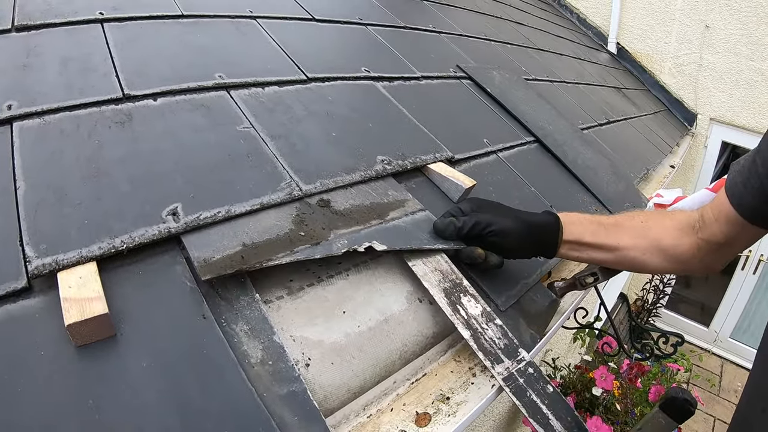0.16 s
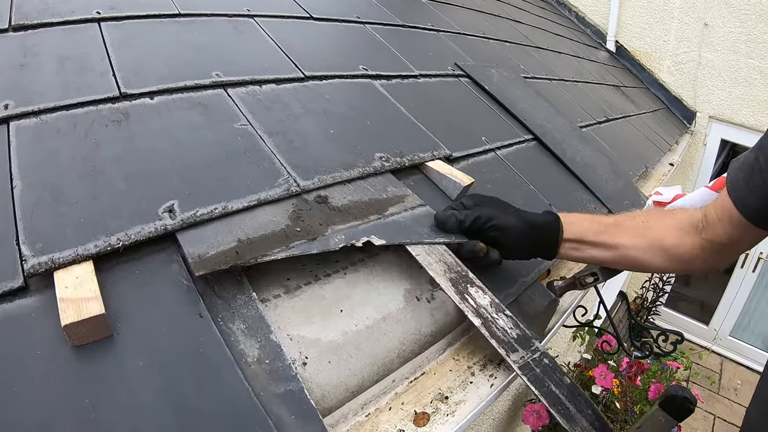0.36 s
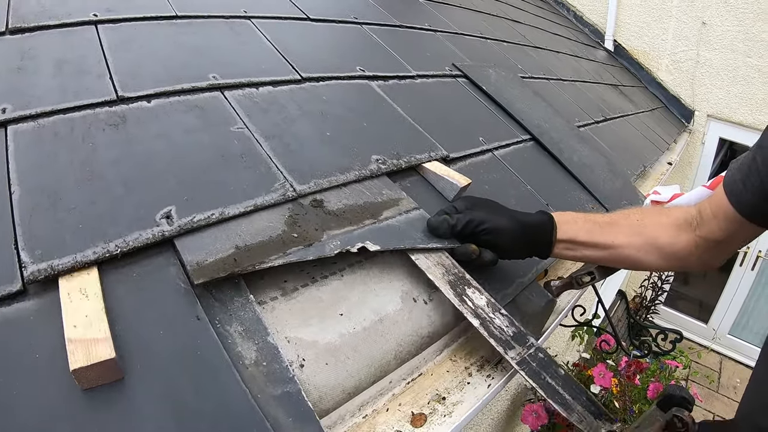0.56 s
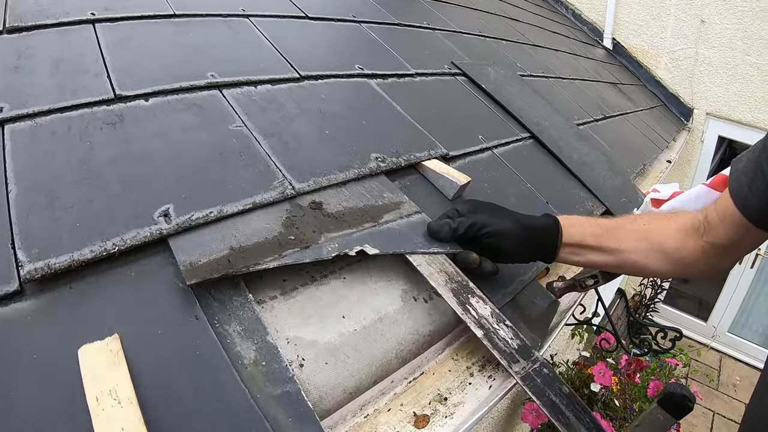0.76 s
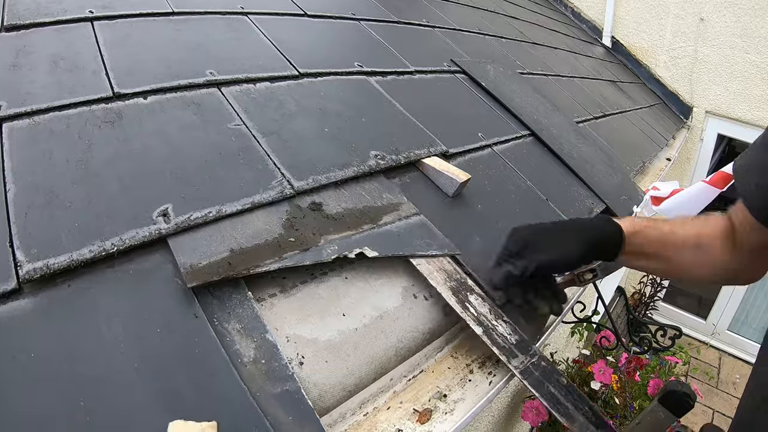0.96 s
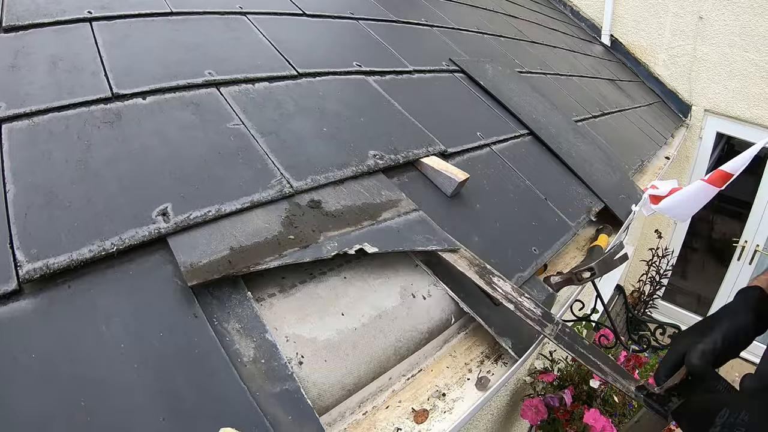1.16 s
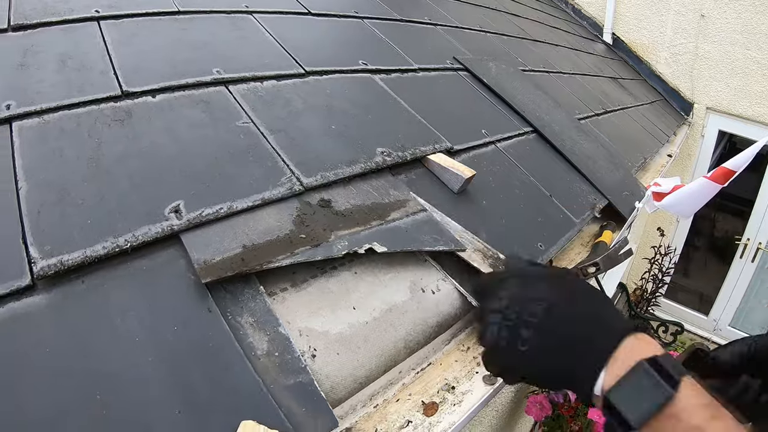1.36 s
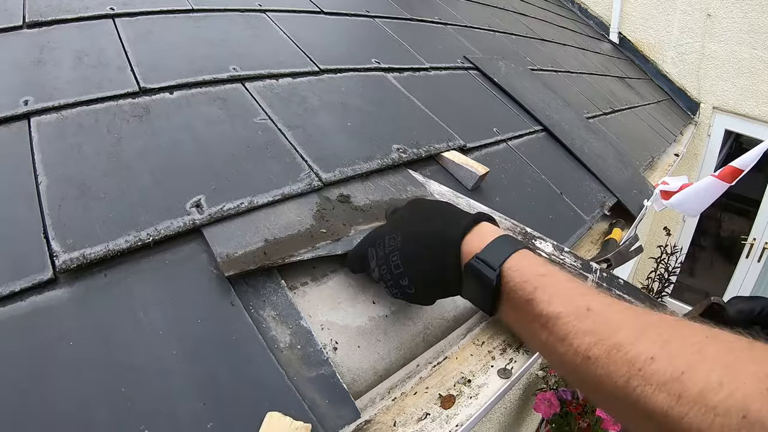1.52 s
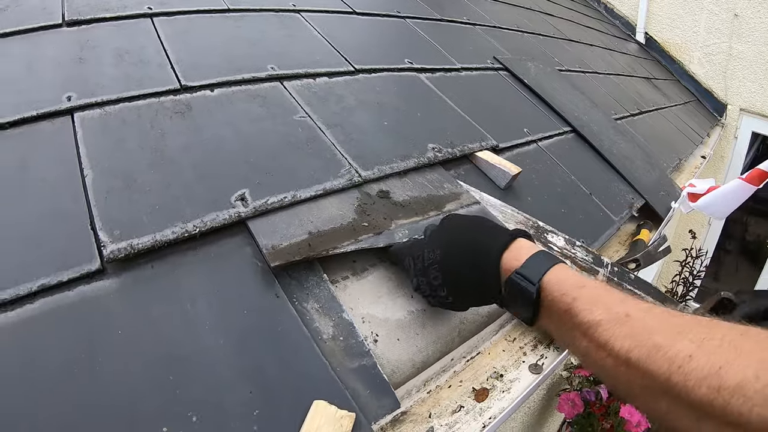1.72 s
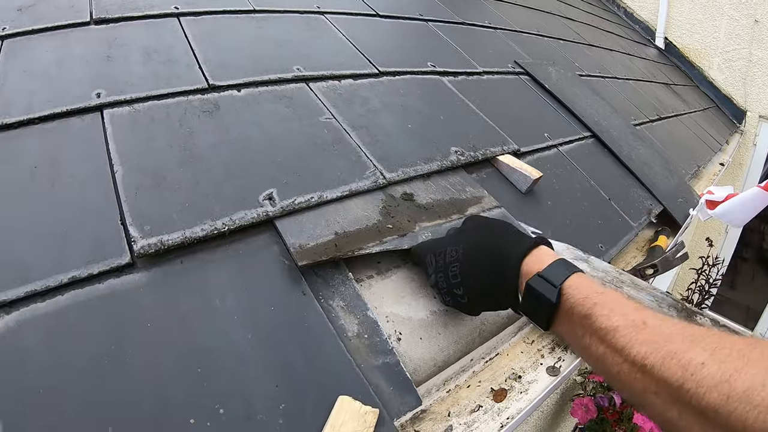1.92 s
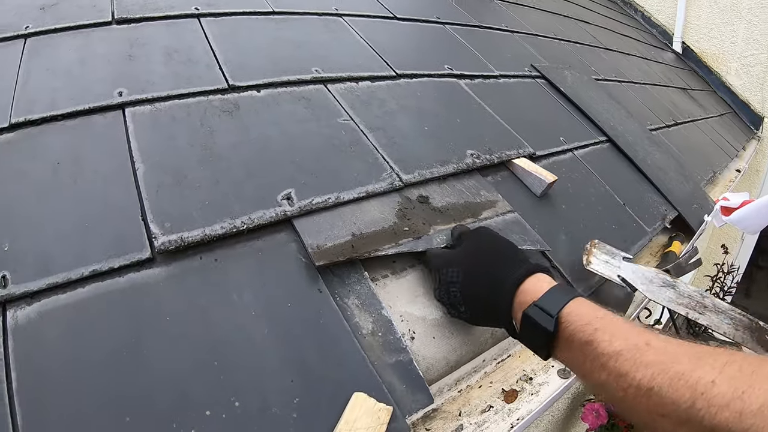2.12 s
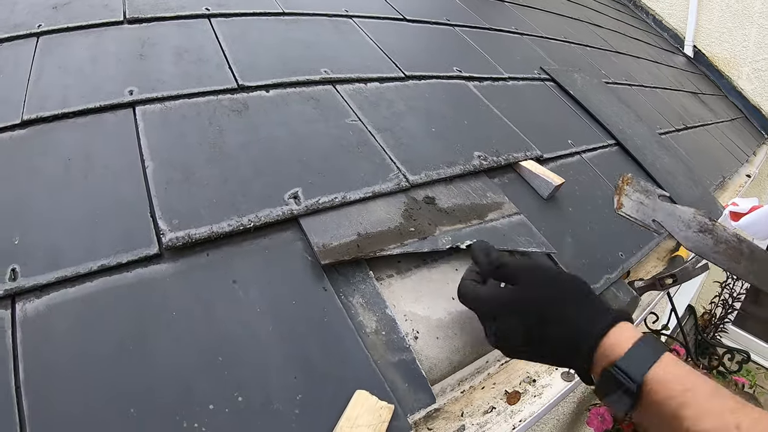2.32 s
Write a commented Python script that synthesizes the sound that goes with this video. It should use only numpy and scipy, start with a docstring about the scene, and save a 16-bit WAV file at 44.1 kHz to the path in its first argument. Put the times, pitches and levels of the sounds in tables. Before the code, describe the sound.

A flat steel bar clicks and clacks against broken roof slate, with gritty scrapes between the knocks and a faint metallic ring. Light wind and handling rumble on the close microphone outdoors.

```python
"""On a roof, a gloved hand works a flat steel bar out from under a broken slate. Sliding friction
excites the resonances of slate and steel; impacts on slate and batten knock, clack and click; the
bar rings faintly in its own modes until a touch damps it, and stick-slip makes its blade tick.
Wind and handling rumble in the single microphone over a quiet outdoor noise floor."""
import sys
import numpy as np
from scipy import signal
from scipy.fft import rfft, irfft, next_fast_len
from scipy.io import wavfile
from scipy.ndimage import uniform_filter1d, map_coordinates

SR = 44100
rng = np.random.default_rng(int(sys.argv[2]) if len(sys.argv) > 2 else 0)


def generate_wav(signal):
    """Clip the signal to [-1, 1] and save it as 16-bit WAV at the path in sys.argv[1]."""
    frames = np.transpose(np.atleast_2d(signal))
    scaled = np.clip(frames, -1, 1) * 32767
    pcm = np.round(scaled).astype(np.int16)
    wavfile.write(sys.argv[1], SR, pcm)


N = 105840

# normal modes of the steel bar: f/Hz, level/dB, T60/s
BAR_MODES = [(2275, 0, .2), (2662, 0, 2), (3070, 0, .7), (3413, 0, .6), (3670, 0, .2), (4380, -2, .6),
             (4502, 0, .5), (4702, 0, .5), (4955, 1, .85), (5060, -8, .15), (5306, 0, .5), (5706, 0, .35),
             (6290, -4, .25), (6710, 0, .25), (7160, 0, .3), (7750, 0, .12), (8470, 0, .15), (11900, 0, .2)]
RISE_S = 0.00038  # time constant of a contact's onset


def amp(db):
    """Amplitude ratio of a level in dB."""
    return 10 ** (np.asarray(db) / 20)


def unit(x):
    """Normalisation to rms 1."""
    return x / np.sqrt(np.mean(x ** 2, axis=-1, keepdims=True) + 1e-20)


def curves(rows):
    """Linear interpolation in time: one value per sample for each column after the first."""
    s, *cols = np.transpose(rows)
    return [np.interp(np.arange(N) / SR, s, c) for c in cols]


def along(points, f):
    """Interpolation of (f/Hz, value) points on a logarithmic frequency axis."""
    hz, values = np.transpose(points)
    return np.interp(np.log(f + 1), np.log(hz), values)


def wobble(rate):
    """Smooth random modulation: a spline through `rate` knots a second."""
    knots = rng.standard_normal(int(N * rate / SR) + 4)
    return map_coordinates(knots, [np.arange(N) * rate / SR])


def filtered(x, response):
    """Linear filtering: the spectrum of x times a complex frequency response."""
    m = next_fast_len(2 * x.shape[-1])
    return irfft(rfft(x, m) * response(np.fft.rfftfreq(m, 1 / SR)), m)[..., :x.shape[-1]]


def resonance(f, hz, width_hz):
    """Frequency response of a damped oscillator."""
    return 1j * f * width_hz / (hz * hz - f * f + 1j * f * width_hz)


def band(f, lo_hz, hi_hz):
    """Band-pass magnitude with fourth-order slopes."""
    return 1 / np.sqrt((1 + (lo_hz / (f + 1e-3)) ** 8) * (1 + (f / hi_hz) ** 8))


def scrape():
    """Forced vibration: juddering friction and loose grit drive the resonances of slate and bar."""
    # resonances of the slate: f/Hz, bandwidth/Hz, level/dB
    slate_modes = [(2527, 440, 7.5), (3855, 310, 2.5), (4247, 160, 0.5), (12900, 340, 2.5)]
    # edges of the low, middle, upper and top band: f/Hz
    edges = [250, 1200, 4000, 9000, 16000]
    # strokes of the bar: start t/s, peak t/s, end t/s, then level/dB in each of the four bands
    strokes = [(0, 0.042, 0.072, -41, -68, -52, -53), (0.059, 0.077, .17, -37, -48.5, -46, -48),
               (0.174, 0.19, 0.2, -48, -52.5, -49, -80), (0.267, 0.27, 0.35, -44, -51, -48, -58),
               (0.307, 0.34, 0.37, -47, -61, -58, -47.5), (0.433, 0.48, 0.59, -38.5, -46, -51, -51),
               (0.566, 0.66, 0.65, -34, -44.5, -43, -46.5), (0.638, 0.68, 0.81, -34.5, -44.5, -43, -47.5),
               (0.71, 0.77, 0.96, -46, -43.5, -42, -47.5), (0.811, 0.85, 0.82, -32.5, -34.5, -49, -44),
               (0.836, 0.89, 0.99, -43.5, -72, -71, -76), (0.972, 0.98, 1.093, -46, -47, -47.5, -43.5),
               (1.01, 1.018, 1.184, -41, -48.5, -48, -45.5),
               (1.17, 1.244, 1.297, -35.5, -45.5, -46.5, -43.5), (1.252, 1.31, 1.33, -32, -41, -73, -67),
               (1.314, 1.386, 1.505, -41, -51, -53, -51), (1.393, 1.42, 1.54, -48.5, -53, -46.5, -52),
               (1.587, 1.6245, 1.678, -39, -33.5, -33, -39.5), (1.684, 1.713, 1.93, -42.5, -58, -48, -61),
               (1.713, 1.7, 1.76, -32, -50, -50, -70), (1.746, 1.78, 1.819, -36.5, -33.5, -34, -36),
               (1.833, 1.833, 1.918, -31, -39.5, -37.5, -44), (1.905, 1.952, 2.065, -39, -50, -49, -56)]
    grains_per_s, grit_db, spread_db, judder_db, ends_db = 900, -14, 5, 2.5, -20

    def body(f):
        slate = sum(amp(db) * resonance(f, hz, width) for hz, width, db in slate_modes)
        steel = sum(resonance(f, hz, width_hz=35) for hz, _, _ in BAR_MODES)
        return amp(-2) + slate + amp(11) * steel

    grains = rng.random(N) < grains_per_s / SR
    grit = grains * amp(spread_db * np.minimum(rng.exponential(size=N), 2)) * rng.standard_normal(N)
    judder = amp(judder_db * (wobble(40.33) + wobble(170)))
    friction = unit(judder * rng.standard_normal(N))
    rub = filtered(friction + amp(grit_db) * unit(grit), body)
    bands = np.array([unit(filtered(rub, lambda f: band(f, lo, hi)))
                      for lo, hi in zip(edges, edges[1:])])
    t, power = np.arange(N) / SR, np.zeros((len(bands), N))
    for start, top, end, *db in strokes:  # overlapping strokes add in power
        from_peak = np.maximum((top - t) / max(top - start, .004), (t - top) / max(end - top, .004))
        power += amp(np.array(db)[:, None] + ends_db * np.minimum(from_peak, 3) ** 2) ** 2
    return (np.sqrt(power) * bands).sum(0)


def microphone_rumble():
    """Low-frequency pressure fluctuations from wind and handling: sway, deep rumble and lumpy thuds."""
    # buffeting of the microphone: t/s, deep level/dB, thud level/dB
    buffeting = [(0.0, -28, -38), (0.05, -49, -36.5), (0.31, -30.5, -37.5), (0.41, -52, -52),
                 (0.47, -39, -26.5), (0.61, -34, -44.5), (0.63, -50, -30.5), (0.69, -37, -25.5),
                 (0.79, -38, -45.5), (0.85, -38.5, -36.5), (1.13, -41.5, -46), (1.26, -37, -35),
                 (1.38, -46, -34.5), (1.62, -31, -48.5), (1.65, -36, -29), (1.88, -38.5, -51.5),
                 (1.95, -27.5, -27), (2.17, -42.5, -61.5), (2.38, -44, -58.5), (2.4, -30.5, -44.5)]
    # slow pressure on the microphone: t/s, level/dB
    pressure = [(0, -30), (.2, -34.5), (.33, -15), (.5, -25.5), (1, -24), (1.5, -25.5), (2.05, -27),
                (2.4, -35.5)]
    deep_db, thud_db = curves(buffeting)
    noise = lambda response: unit(filtered(rng.standard_normal(N), response))
    sway = amp(curves(pressure)[0]) * noise(lambda f: band(f, 3.0, 19) / (f + 3) ** 1.88)
    deep = amp(deep_db) * noise(lambda f: band(f, 19, 70) / (f + 15))
    thud = amp(thud_db + 1.5 * wobble(25)) * noise(lambda f: band(f, 79, 260) / (f + 150))
    return sway + deep + thud


def outdoor_air():
    """Ambient noise: a continuous spectrum, strongest at low frequencies, whose level wavers."""
    # spectral density of the outdoor floor: f/Hz, relative level/dB
    spectrum = [(250, -4.5), (700, -8), (2000, -18), (5000, -21), (9000, -27.5), (15500, -25.5)]
    # its envelope: t/s, level/dB
    envelope = [(0, -53), (1.5, -50.5), (2.05, -59.5), (2.4, -61)]
    hiss = filtered(rng.standard_normal(N), lambda f: amp(along(spectrum, f)) * band(f, 170, SR))
    return amp(curves(envelope)[0] + 0.71 * wobble(13)) * unit(hiss)


def impacts():
    """Impact excitation: a blow and a crunch drive three resonances (knock, clack, click) and a crack."""
    # contacts on slate and batten: t/s, level/dB, then relative level/dB and f/Hz for each of
    # knock, clack and click, then relative level/dB of the crack, T60/s of the clack
    contacts = [(0.075, -21, -17, 700, -5.5, 2490, -12.5, 5200, -26, 0.048),
                (0.084, -24, -8.5, 444, -9, 2400, -8.5, 7400, -26, 0.033),
                (0.267, -4.5, -19.5, 833, -15.5, 2760, -7, 6720, -21, 0.064),
                (0.272, -1.5, -20.5, 850, -8.5, 2564, -9, 7440, -18, 0.039),
                (0.291, -25.5, -8, 368, -3, 1564, -25, 5500, -26, 0.061),
                (0.305, -30, -13, 360, -9, 2240, -5, 5800, -21, 0.03),
                (0.388, -38, -7.5, 343, -3.5, 1500, -30, 4820, -30, 0.047),
                (0.453, -28, -14, 800, -5, 2450, -20, 5460, -35, 0.04),
                (0.458, 0, -17, 904, -8.5, 1805, -12, 5480, -29, 0.041),
                (0.478, -17.5, -10, 846, -16, 1550, -25, 4700, -33, 0.053),
                (0.525, -23.5, -8.5, 500, -16, 1470, -12, 6930, -25, 0.047),
                (0.637, -4, -16.5, 559, -16.5, 1690, -14, 8250, -20, 0.042),
                (0.643, -17, -14, 845, -19, 1890, -4.5, 5330, -29, 0.039),
                (0.6884, -16.5, -5, 915, -31, 1650, -26, 6300, -26, 0.036),
                (0.707, -16.5, -12.5, 422, -29, 1320, -12, 8650, -22, 0.031),
                (0.857, -10, -7.5, 599, -13.5, 2710, -19, 6600, -37, 0.03),
                (0.89, -33.5, 5, 482, -7, 2360, -24, 5740, -33, 0.035),
                (0.987, -27.5, -17, 358, -11, 1560, -14, 4620, -20, 0.036),
                (1.035, -12, -5.5, 790, -5, 3290, -13, 7770, -11, 0.019),
                (1.066, -20, -9, 1127, -8, 2380, -14, 7850, -21, 0.018),
                (1.091, -16, -11, 1005, -12, 2860, -21, 6600, -26, 0.022),
                (1.122, -5.5, -19, 1010, -23.5, 2820, -21, 7750, -23, 0.018),
                (1.162, -17.5, -19, 1040, -19.5, 2530, -26, 7760, -30, 0.036),
                (1.181, -16, -9, 1407, -1, 2554, -15, 5610, -32, 0.051),
                (1.236, -20, -14, 336, -25, 1480, -13, 8550, -18, 0.064),
                (1.257, -32, -6.5, 424, 1.5, 1310, -21, 7750, -26, 0.088),
                (1.299, -26, -28, 427, -3.5, 1420, -38, 5120, -39, 0.061),
                (1.348, -33, -2, 343, -2, 2480, -12, 4600, -32, 0.068),
                (1.363, -9, -17.5, 758, -10, 2294, -21, 4400, -42, 0.035),
                (1.427, -17, -20, 810, -8, 2600, -22, 6340, -29, 0.043),
                (1.457, -23.5, -15.5, 454, -10, 3230, -12, 6110, -28, 0.038),
                (1.646, -15.5, -8.5, 570.3, -8.5, 1277, -14, 6530, -26, 0.052),
                (1.657, -13.5, -14, 412, -13.5, 2650, -24.5, 7820, -29, 0.025),
                (1.702, -37.5, -10, 467, 1, 1980, -13.5, 5320, -25, 0.029),
                (1.722, -10, -29, 690, -13, 2270, -15, 4810, -43, 0.065),
                (1.788, -11.5, -20.5, 465, -15, 3770, -10.5, 4810, -19, 0.035),
                (1.837, -28, -2, 707, -7, 1210, -23, 6620, -29, 0.082),
                (1.852, -17.5, -14.5, 990, -12, 2140, -9, 6850, -23, 0.045),
                (1.9237, -1, -19, 1406, -8, 2595, -9.5, 8050, -14, 0.047),
                (1.937, -21, -0.5, 796, -10, 2540, 1, 6070, -23, 0.041),
                (1.956, -21.5, -8.5, 388, -8.5, 2600, -14, 5700, -29, 0.038),
                (2.012, -22.5, -15, 340, -6.5, 2650, -9, 5770, -23, 0.03)]
    q = np.array([[1.5], [0.82], [1.2]])  # knock, clack, click
    t60_ratio = np.array([[2.17], [1], [0.68], [0.64]])  # knock, clack, click, crack
    blow_db, tone_db, crunch_db, tail_db, tail_t60 = 12.5, -3.5, 1.5, -20, 0.11
    crack_hz, batten_hz, batten_db = 8800, 420, -4
    out, t = np.zeros(N + SR), np.arange(SR // 8) / SR
    rise = 1 - np.exp(-t / RISE_S)
    tail = rise * amp(tail_db - 60 * t / tail_t60)
    blow = amp(blow_db) * (t == t[8])  # a one-sample impulse
    batten = lambda f: resonance(f, batten_hz, batten_hz) ** 2 * np.sqrt(SR / batten_hz / 2)
    for s, db, knock_db, knock_hz, clack_db, clack_hz, click_db, click_hz, crack_db, t60 in contacts:
        noise = rng.standard_normal((5, len(t)))
        roughness = amp(crunch_db * unit(uniform_filter1d(noise[0], size=40)))
        crunch = unit(noise[1:] * roughness)
        fade = rise * amp(-60 * t / (t60 * t60_ratio))
        hz = np.array([[knock_hz], [clack_hz], [click_hz]])
        responses = lambda f: [*(resonance(f, hz, hz / q) ** 2 * np.sqrt(SR * q / hz / 2)),
                               2 * (1j * f / (crack_hz + 1j * f)) ** 4]  # the crack is a high-pass
        parts = filtered(crunch * (fade + tail) + blow, responses)
        parts[:-1] += amp(tone_db) * fade[:-1] * np.sin(2 * np.pi * hz * t)  # free ringing
        parts[0] += amp(batten_db) * filtered(crunch[0] * fade[0], batten)  # thud under the knock
        gains = amp(db + np.array([knock_db, clack_db, click_db, crack_db]))
        out[round(s * SR):][:len(t)] += gains @ parts
    return out[:N]


def bar_ringing():
    """Free vibration: the bar's modes near a favoured frequency decay until a touch damps them."""
    # blows on the bar: t/s, level/dB, favoured f/Hz, damping touch t/s
    blows = [(.085, -40, 4420, .27), (.085, -43, 5306, .27), (.272, -41, 4400, .31),
             (.303, -37, 2275, .345), (.272, -46, 11900, .4), (.272, -48, 6710, .34),
             (.318, -45, 5706, .357), (.46, -42, 4650, .525), (.49, -48, 6710, .51),
             (1.035, -42, 7750, 1.07), (1.122, -33, 7750, 1.16), (1.122, -46, 8470, 1.22),
             (1.161, -38, 7750, 1.18), (1.181, -38, 7750, 1.22), (1.363, -56, 4440, 1.58),
             (1.655, -46, 5706, 1.71), (1.655, -47, 5200, 1.71), (1.79, -31, 3300, 1.835),
             (1.79, -37, 4850, 1.92), (1.79, -38, 6900, 1.835), (1.924, -36, 2600, 1.99),
             (1.924, -38, 5706, 2.0), (1.924, -47, 5000, 2.01), (2.012, -51, 4900, 2.235),
             (.268, -19, 6290, .272), (.27, -20, 5706, .274), (.272, -20, 3350, .275),
             (1.924, -18, 3670, 1.926), (1.924, -17, 5706, 1.926), (1.924, -21, 3100, 1.927),
             (2.012, -58, 4500, 2.4), (2.012, -62, 2662, 2.37), (2.012, -66, 3200, 2.4)]
    falloff_db_per_oct, damped_t60 = 125, .04
    out, t = np.zeros(N + SR), np.arange(SR // 2) / SR
    rise = 1 - np.exp(-t / RISE_S)
    hz, mode_db, t60 = np.transpose(BAR_MODES)[:, :, None]
    for s, db, favoured_hz, damped_s in blows:
        gain = amp(db + mode_db - falloff_db_per_oct * abs(np.log2(hz / favoured_hz)) - 60 * t / t60)
        damping = amp(-60 * np.clip(t + s - damped_s, 0, 1) / damped_t60)
        modes = np.sin(2 * np.pi * (hz * t + rng.random(hz.shape)))
        out[round(s * SR):][:len(t)] += rise * damping * (gain * modes).sum(0)
    return out[:N]


def blade_ticks():
    """Stick-slip: each slip excites a few heavily damped modes of the blade, heard as a dry tick."""
    # slips of the blade: t/s, level/dB, favoured f/Hz
    slips = [(0.708, -20.5, 9500), (.722, -27, 8000), (0.7357, -24, 9500), (.752, -25, 10500),
             (.761, -25, 8300), (0.766, -25, 4500), (.771, -26, 6400), (0.7826, -22.5, 8200),
             (0.7926, -19, 5300), (0.801, -22, 5300), (.8155, -24, 5600), (.82, -25, 6400),
             (.848, -26, 8200)]
    # modes of the blade: f/Hz
    blade_modes = [4400, 6400, 8250, 12500]
    falloff_db_per_oct, t60 = 14, .009
    out, t, hz = np.zeros(N), np.arange(SR // 50) / SR, np.array(blade_modes)[:, None]
    rise = 1 - np.exp(-t / RISE_S)
    for s, db, favoured_hz in slips:
        gain = amp(db - falloff_db_per_oct * abs(np.log2(hz / favoured_hz)) - 60 * t / t60)
        detuned_hz = hz * (1 + 0.034 * rng.standard_normal(hz.shape))
        out[round(s * SR):][:len(t)] += rise * (gain * np.sin(2 * np.pi * detuned_hz * t)).sum(0)
    return out


def scene():
    """Superposition: all sources add at one microphone."""
    mono = impacts() + blade_ticks() + bar_ringing() + scrape() + outdoor_air() + microphone_rumble()
    return np.array([mono, mono])


def record(dry):
    """Mid-side mixing and filtering: a faint blur parts the channels; the treble dips, then cuts off."""
    # difference between the channels: f/Hz, side level/dB relative to mid
    side_spectrum = [(60, -56.5), (180, -49), (550, -41.5), (1650, -45), (4970, -34.5), (15000, -23)]
    # treble response of the microphone: f/Hz, level/dB
    treble = [(6000, -0.5), (8500, 0), (9600, -4.5), (12000, -3.5), (16000, -2)]
    cutoff_hz = 16200
    blur_kernel = unit(rng.standard_normal(256)) / np.sqrt(256)
    blur = signal.fftconvolve(dry[0], blur_kernel)[:N]
    side = filtered(blur, lambda f: amp(along(side_spectrum, f)))
    return filtered(dry + [side, -side], lambda f: amp(along(treble, f)) / (1 + (f / cutoff_hz) ** 80))


dry = scene()
out = record(dry)
generate_wav(out)
```